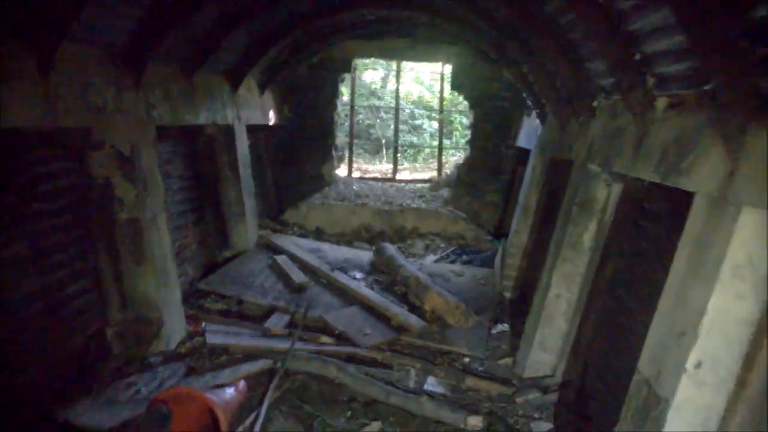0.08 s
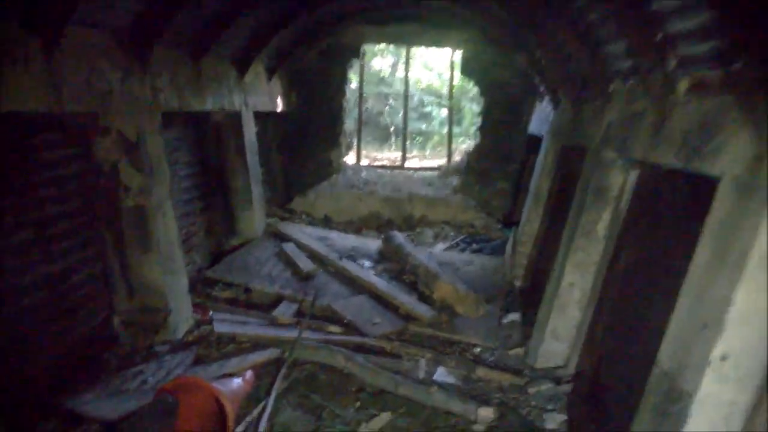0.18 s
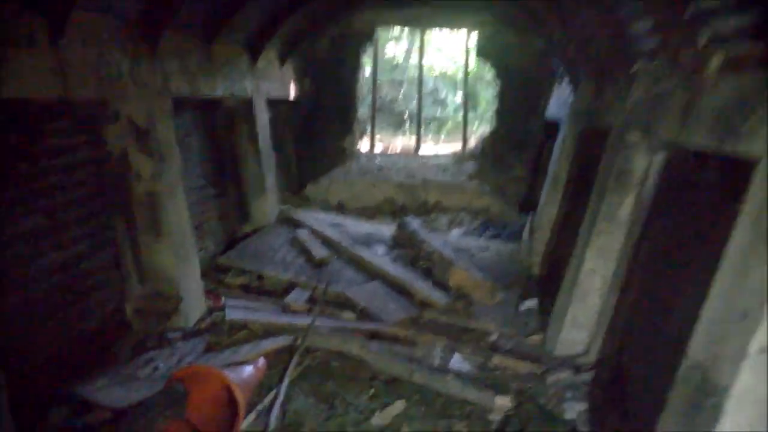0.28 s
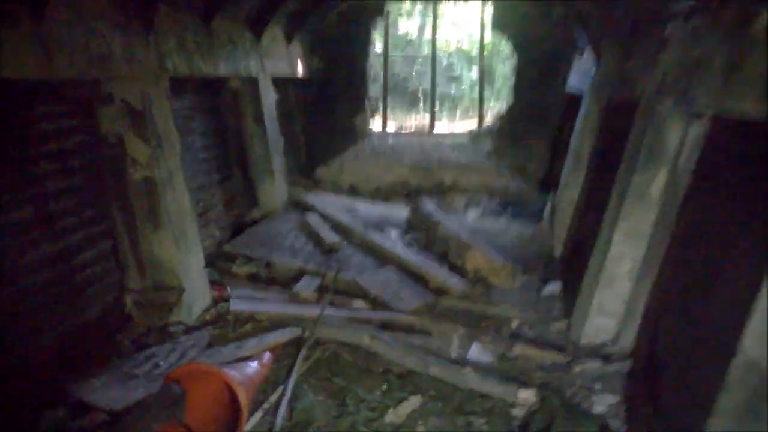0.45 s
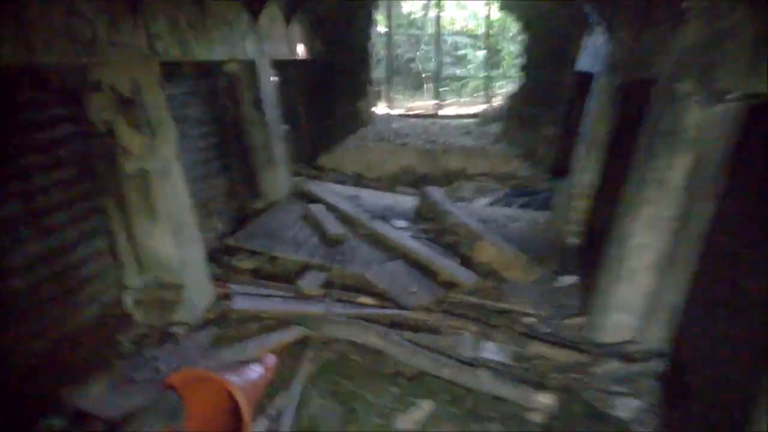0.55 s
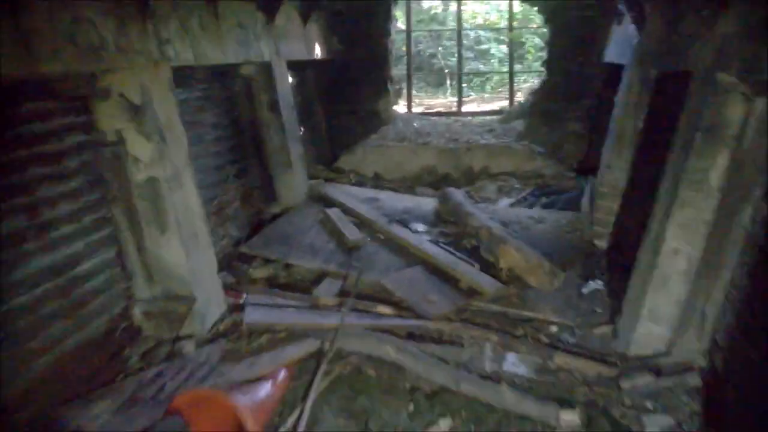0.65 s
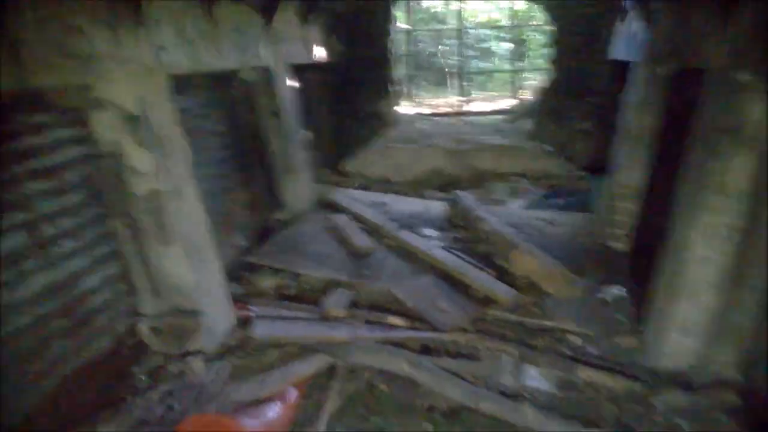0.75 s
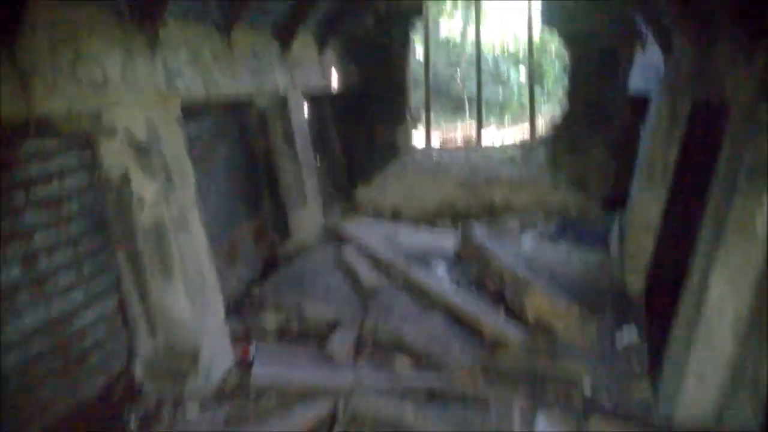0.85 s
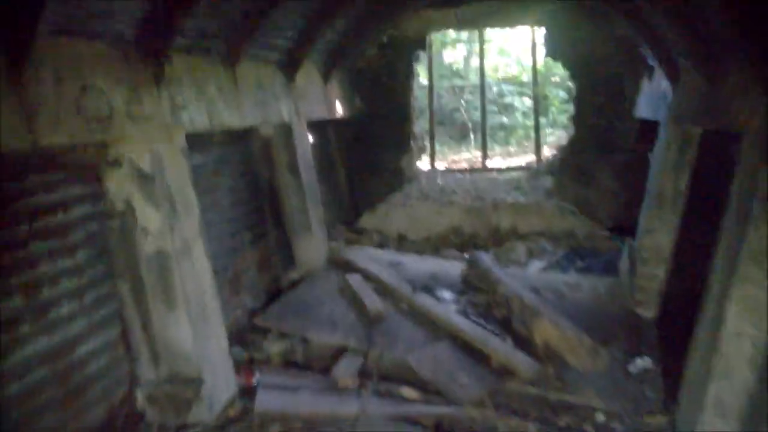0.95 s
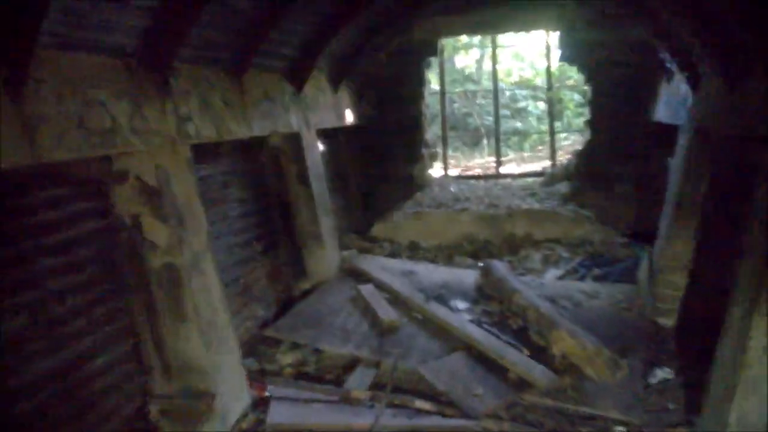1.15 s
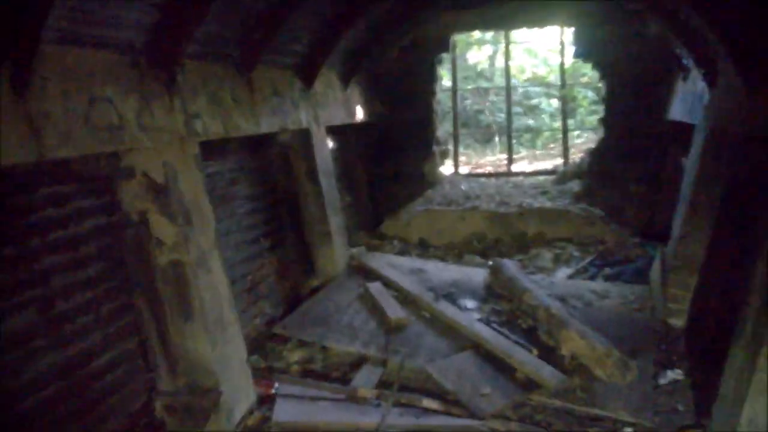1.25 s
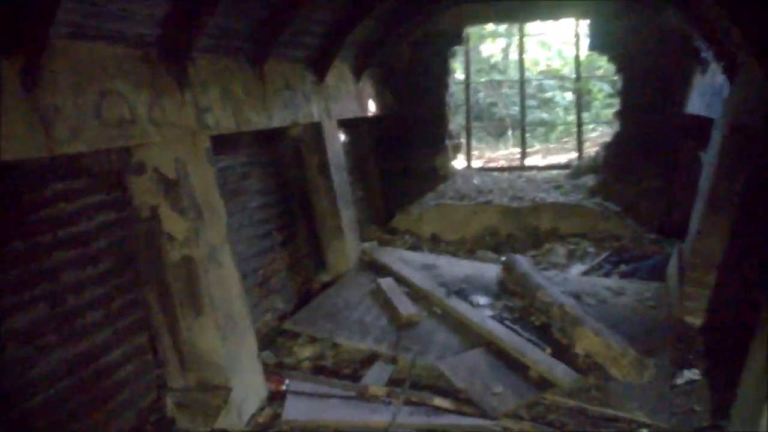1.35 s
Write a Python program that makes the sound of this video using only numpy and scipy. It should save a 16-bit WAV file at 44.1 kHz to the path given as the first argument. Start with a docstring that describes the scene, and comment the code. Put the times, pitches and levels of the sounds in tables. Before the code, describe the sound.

Footsteps crunch and scrape on broken glass and rubble inside a short, echoey concrete tunnel.

```python
"""Feet shift on broken glass and rubble in a concrete tunnel, over low air rumble and faint drifting hiss.
First, soft crunches of random grains scrape under the soles, with quiet pitched knocks among them.
Near 0.4 s comes the loudest burst: knocks, high-passed ticks and shivering glass; a second follows at 0.6 s.
Bright ticks snap near 0.96 s, then faint crunches and small cracks trail off to the end.
The walls answer cracks and scrapes with a short dense tail of random echoes."""
import sys
import numpy as np
from scipy import signal
from scipy.io import wavfile
from scipy.ndimage import uniform_filter1d

SR = 44100
rng = np.random.default_rng(int(sys.argv[2]) if len(sys.argv) > 2 else 0)


def inscribe(sig):
    """Save sig as 16-bit PCM at rate SR to the path in sys.argv[1].

    A 1-D sig is mono; a 2-D sig holds one channel per row.
    Samples are clipped to [-1, 1] before scaling.
    """
    pcm = np.round(np.clip(np.atleast_2d(sig).T, -1, 1) * 32767)
    wavfile.write(sys.argv[1], SR, pcm.astype(np.int16))


N = 61740  # 1.4 s


def gain_of(db):
    """Amplitude factor of a level in dB."""
    return 10 ** (np.asarray(db) / 20)


def evened(x):
    """Scale to an RMS of one."""
    return x / np.sqrt(np.mean(x ** 2) + 1e-20)


def read(points, hz):
    """Value of a table at the given frequencies, interpolated on a log-frequency axis."""
    table_hz, value = np.transpose(points)
    return np.interp(np.log(hz + 1), np.log(table_hz + 1), value)


# Level curve of the low air: (time [s], RMS level [dB])
RUMBLE_LEVELS = [(0.0, -55.5), (0.178, -65), (0.236, -55), (0.35, -62.5), (0.486, -47.5), (0.514, -57.5),
                 (1.032, -49.5), (1.064, -56), (1.216, -54.5), (1.244, -69), (1.29, -49.5), (1.348, -68),
                 (1.372, -50.5), (1.4, -55)]


def rumble():
    """Lumpy low air on the microphone: band-passed noise that follows a level curve."""
    band = signal.butter(3, (26.2, 70), "band", fs=SR, output="sos")  # band edges in Hz
    noise = rng.standard_normal(N + SR)
    low = evened(signal.sosfilt(band, noise)[SR:])  # skip the filter's first second
    level_db = np.interp(np.arange(N) / SR, *np.transpose(RUMBLE_LEVELS))
    return low * gain_of(level_db)


# Spectral shape of the hiss: (frequency [Hz], relative level per Hz [dB])
HISS_SPECTRUM = [(65, -31), (110, 4.5), (498, -5.5), (601, -0.5), (841, 0), (1420, -7.5), (4790, -12),
                 (8800, -20), (12800, -18.5), (15500, -20), (16500, -37)]
HISS_DB, DRIFT_DB = -63, -0.5  # overall RMS level; RMS depth of the drift (its sign is random)


def air():
    """Faint hiss of the tunnel: shaped spectral noise whose bands drift slowly in level."""
    frames, hz = N // 512 + 5, np.fft.rfftfreq(2048, 1 / SR)
    real, imag, drift = rng.standard_normal((frames, 1025, 3)).T
    drift = uniform_filter1d(drift, 40, 0)  # smooth across frequency
    drift = evened(uniform_filter1d(drift, 6, 1))  # smooth over time
    level_db = read(HISS_SPECTRUM, hz)[:, None] + DRIFT_DB * drift
    spectrum = (real + 1j * imag) * gain_of(level_db)
    hiss = signal.istft(spectrum, nperseg=2048, noverlap=1536)[1][:N]
    return gain_of(HISS_DB) * evened(hiss)


# How long the walls ring: (frequency [Hz], 60 dB decay time [s])
WALL_DECAY = [(250, 0.6), (660, 0.27), (1740, 0.25), (4590, 0.17), (12100, 0.15)]
ONSET_S, BUILD_S = 0.0013, 0.0049  # silence before the first echo, then the linear build-up


def tunnel(x):
    """Dense echoes of random sign that build up in a few ms, each band dying at its own speed."""
    t = np.arange(SR // 2) / SR
    echoes = rng.standard_normal(len(t)) * (rng.random(len(t)) < .25)
    hz, when, bands = signal.stft(echoes, SR, nperseg=256)
    decay = gain_of(-60 * when / read(WALL_DECAY, hz)[:, None])
    tail = signal.istft(bands * decay, SR, nperseg=256)[1][:len(t)]
    tail = tail * np.clip((t - ONSET_S) / BUILD_S, 0, 1)
    return signal.fftconvolve(x, tail / np.linalg.norm(tail))[:N]


def pressure(start, rise, hold, t60):
    """Sole pressure of one crunch: a near-linear rise, a hold and an exponential fade."""
    t = np.arange(N) / SR - start
    fade = gain_of(-60 * np.maximum(t - rise - hold, 0) / t60)
    return np.clip(t / rise, 0, 1) ** 0.84 * fade


# Crunches of the sole: (start [s], rise [s], hold [s], 60 dB fade time [s],
#  rubble level [dB], chips level [dB], shards level [dB], splinters level [dB], fine grit level [dB])
CRUNCH_EVENTS = [(.0, 0.0036, 0.0059, 0.11, -64, -65.5, -72, -68.5, -75),
                 (.08, 0.0037, 0.0042, 0.096, -55.5, -65, -92, -93, -84),
                 (0.115, 0.0037, 0.051, 0.2, -54, -65.5, -71, -69.5, -72.5),
                 (0.186, 0.008, 0.02, 0.076, -60, -46.5, -60, -77, -76),
                 (0.21, 0.0062, 0.019, 0.15, -48, -46.5, -50.5, -54.5, -53),
                 (0.328, 0.045, 0.019, 0.42, -43, -50.5, -52, -55, -58.5),
                 (0.382, 0.0093, 0.008, 0.091, -60, -53, -41, -42.5, -48),
                 (0.41, 0.0071, 0.016, 0.2, -48, -40.5, -35.5, -43.5, -47),
                 (0.546, .04, 0.0065, 0.17, -57.5, -60.5, -64, -62, -61),
                 (0.606, 0.0041, 0.046, 0.14, -45, -46, -44.5, -46.5, -52),
                 (0.665, 0.058, 0.032, .18, -44.5, -42, -47.5, -46.5, -46.5),
                 (0.773, 0.038, 0.019, 0.21, -55.5, -56.5, -55, -55, -54.5),
                 (0.9587, 0.0027, .024, 0.11, -52.5, -44.5, -41.5, -40.5, -38.5),
                 (0.998, 0.0064, 0.029, 0.073, -76, -78, -73, -54.5, -63),
                 (1.137, 0.048, .012, 0.092, -56.5, -61.5, -66, -71, -69),
                 (1.198, 0.0049, 0.024, 0.061, -59, -71, -60.5, -62.5, -63.5),
                 (1.274, 0.014, 0.022, 0.12, -72, -63.5, -59, -53.5, -56),
                 (1.3703, 0.0052, .024, .16, -55.5, -55.5, -52, -66, -70)]
# Grain types, rubble to fine grit:
# (lowest pitch [Hz], highest pitch [Hz], length [cycles], mean density [grains/s], size spread [dB])
GRAIN_TYPES = [(315, 900, 1.81, 1800, 2.0), (869, 1970, 3.27, 2500, 1.5), (2160, 4600, 2.8, 5100, 2),
               (4440, 7620, 3.9, 8000, 3), (8000, 16600, 2.7, 16000, 2.0)]


def scrape():
    """Dense random grains, coarse to fine, each a short decaying sine, under the pressure of the sole."""
    shapes = np.array([pressure(*row[:4]) for row in CRUNCH_EVENTS])
    levels = gain_of([row[4:] for row in CRUNCH_EVENTS]).T @ shapes  # one curve per grain type
    out, pitches = np.zeros(N), 16
    for (lo_hz, hi_hz, cycles, per_s, spread_db), level in zip(GRAIN_TYPES, levels):
        size = gain_of(spread_db * np.minimum(rng.exponential(1, N), 5))
        size *= rng.random(N) < per_s / SR  # random moments
        size *= rng.choice([-1., 1.], N)
        size = evened(size) * level
        which = rng.integers(0, pitches, N)  # a random pitch for each grain
        for k, hz in enumerate(np.geomspace(lo_hz, hi_hz, pitches)):
            u = np.arange(0, 5 * cycles / hz, 1 / SR) * hz / cycles  # time in grain lengths
            grain = u * np.exp(-3 * u) * np.sin(2 * np.pi * cycles * u)
            grain /= np.linalg.norm(grain)
            out += signal.oaconvolve(size * (which == k), grain)[:N]
    return out


def add(mix, s, sound):
    """Lay a sound into the mix at a time in seconds."""
    part = mix[round(s * SR):][:len(sound)]
    part += sound[:len(part)]


def ring(hz, t60, t):
    """A sine that dies by 60 dB in t60 seconds."""
    return gain_of(-60 * t / t60) * np.sin(2 * np.pi * hz * t)


# Cracks and knocks: (time [s], level [dB], knock pitch [Hz], knock 60 dB decay time [s],
#  tick level re crack [dB], glass level re crack [dB])
CRACK_EVENTS = [(0.0809, -39.5, 517, 0.015, -25, -31), (0.123, -46.5, 340, 0.044, -22, -28),
                (0.1932, -35, 1400, 0.011, -24, -36), (0.2113, -35.5, 527, 0.056, -20, -29),
                (.358, -25.5, 700, 0.015, -28, -32), (.3615, -18, 702, 0.022, -29, -23),
                (.363, -37, 289, 0.1, -40, -40), (0.37, -32, 5300, 0.0045, -12, -23),
                (0.3857, -22, 2190, .009, -4, -9), (0.395, -31, 6700, 0.015, -14, -15),
                (0.4172, -10, 2510, 0.0053, -13, -14.5), (0.4166, -11, 3950, 0.0029, -18, -30),
                (.417, -20, 6740, .004, -18, -32), (.425, -39, 380, 0.18, -40, -40),
                (.4214, -13.5, 3360, 0.0064, -15, -7.5), (0.6101, -26.5, 2444, 0.021, -12, -1),
                (0.634, -25, 2230, 0.0092, -14, -11), (.639, -24, 730, 0.015, -20, -22),
                (.640, -19.5, 2500, 0.0043, -16, -12.5), (.655, -36.5, 3620, 0.019, -20, -25),
                (0.7009, -32, 1140, .007, 3, -18), (.705, -37, 222.4, 0.093, -40, -40),
                (.735, -39.5, 261, 0.077, -40, -42), (0.9569, -23.5, 1140, 0.0081, 7, -37),
                (.958, -42.5, 500, 0.029, -30, -32), (0.9706, -21, 13600, 0.0057, -21, -38),
                (0.977, -46, 1200, 0.0067, 20, -3), (1.1365, -47.5, 1010, 0.014, -12, -16),
                (1.1594, -39, 516, 0.0053, -19, -11), (1.166, -50, 4200, .005, -10, -15),
                (1.178, -43.5, 2400, .009, -16, 2.5), (1.195, -38, 2240, .008, -15, -9),
                (1.2002, -47, 4850, 0.0045, 2, -20), (1.206, -46, 12600, .004, 6, -20),
                (1.280, -45.5, 870, 0.032, 2, -15), (1.287, -41, 4900, .01, 7, -33),
                (1.371, -33.5, 2380, 0.0038, -14, -16), (1.385, -40, 4110, 0.024, -20, -20)]
# Ringing modes of the glass: (frequency [Hz], level [dB], 60 dB decay time [s])
GLASS_MODES = [(2148, -22, 0.045), (2325, -11, 0.16), (2320, -13.5, 0.097), (2446, -10, 0.079),
               (2520, -20, 0.069), (2880, -34, 0.02), (3300, -20, 0.017), (3890, -15, 0.036)]
TICK_HZ, TICK_S = 3350, 0.00056  # high-pass corner and decay constant of the tick
SHIVER_S, SOFT_CYCLES = 0.013, 0.17  # decay constant of the shaking; knock attack in cycles


def cracks():
    """Each break is a short pitched knock, a bright tick and shards that shiver for a moment."""
    out, t = np.zeros(N), np.arange(6000) / SR
    high = signal.butter(2, TICK_HZ, "high", fs=SR)
    glass = np.zeros(len(t))
    for k, (hz, db, t60) in enumerate(GLASS_MODES):
        glass += (-1) ** k * gain_of(db) * ring(hz, t60, t)  # neighbours in opposite phase
    noise = rng.standard_normal((len(CRACK_EVENTS), 2, len(t)))
    for (s, db, hz, t60, tick_db, glass_db), (tick_noise, shake_noise) in zip(CRACK_EVENTS, noise):
        knock = ring(hz, t60, t) * (1 - np.exp(-t * hz / SOFT_CYCLES))
        snap = .5 * (t == 0) + 0.5 * tick_noise  # one click plus noise
        tick = signal.lfilter(*high, snap * np.exp(-t / TICK_S))
        shake = shake_noise * np.exp(-t / SHIVER_S)
        shiver = signal.fftconvolve(shake / np.linalg.norm(shake), glass)[:len(t)]
        crack = knock + gain_of(tick_db) * tick + gain_of(glass_db) * shiver
        add(out, s, gain_of(db) * crack)
    return out


def scene():
    """Cracks and scrapes with their wall echoes, over hiss and rumble, in one channel."""
    hits, rub = cracks(), scrape()
    walls = gain_of(-8) * tunnel(hits) + gain_of(-12.5) * tunnel(rub)  # echo levels in dB
    return (hits + rub + walls + air() + rumble())[None]


def record(dry):
    """The band limit of the recorder: a steep low-pass at 16 kHz."""
    lowpass = signal.firwin(511, 16000, window=("kaiser", 9), fs=SR)
    return signal.oaconvolve(dry, lowpass[None], "same")


dry = scene()
out = record(dry)
inscribe(out)
```